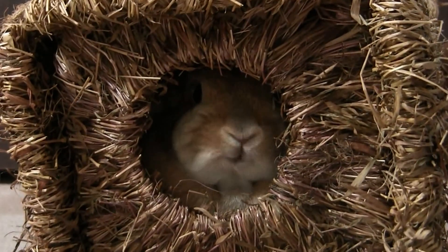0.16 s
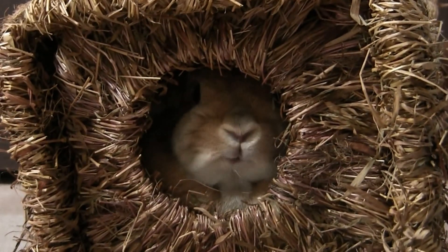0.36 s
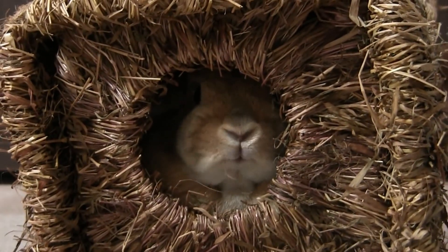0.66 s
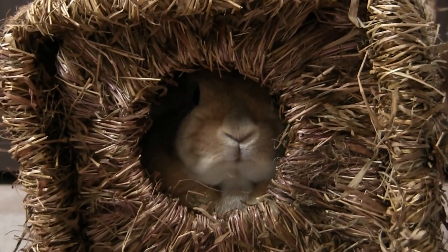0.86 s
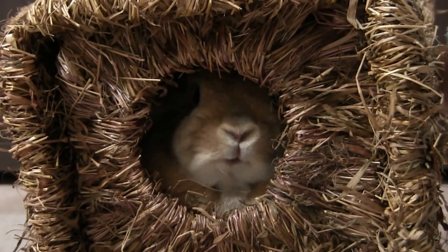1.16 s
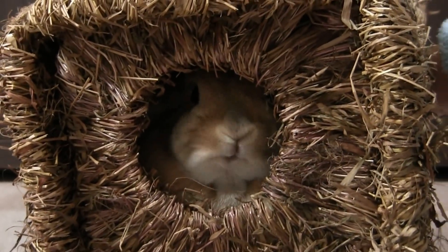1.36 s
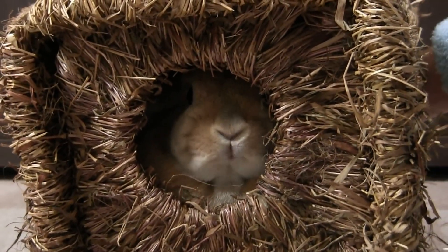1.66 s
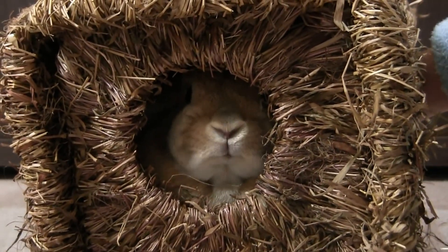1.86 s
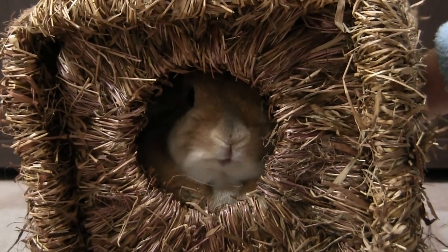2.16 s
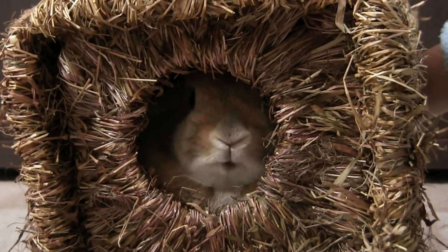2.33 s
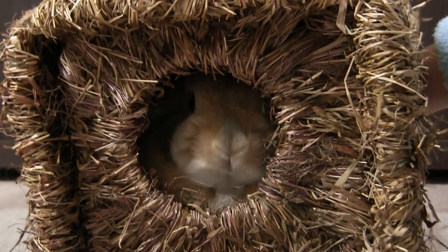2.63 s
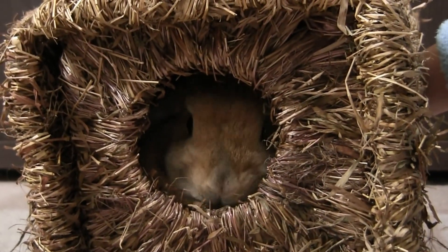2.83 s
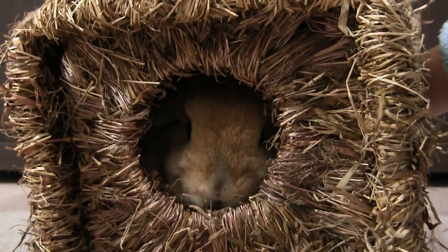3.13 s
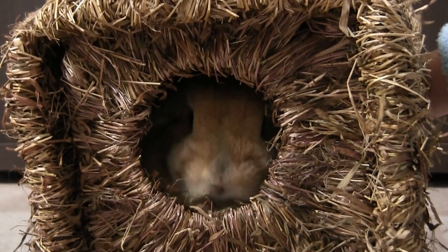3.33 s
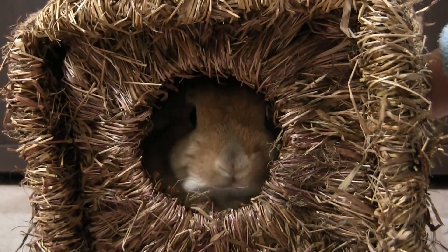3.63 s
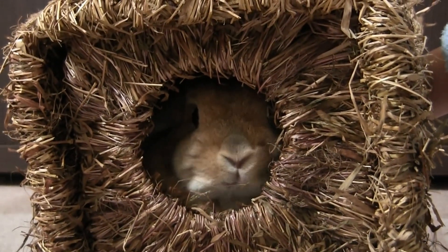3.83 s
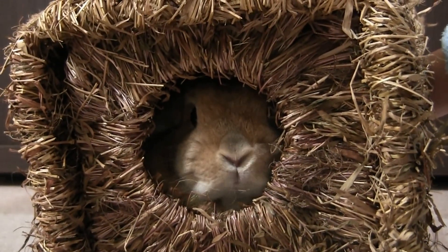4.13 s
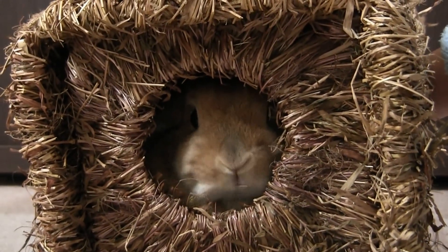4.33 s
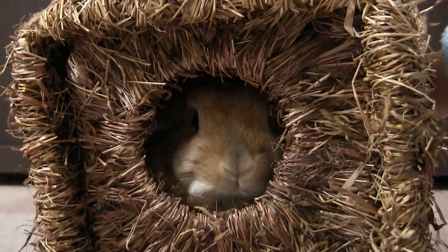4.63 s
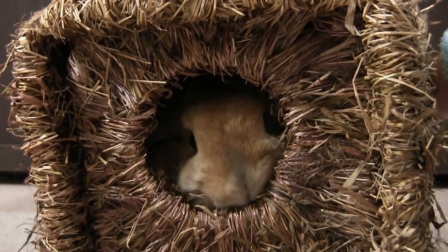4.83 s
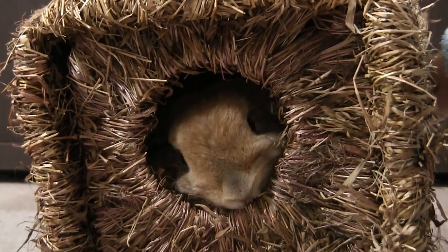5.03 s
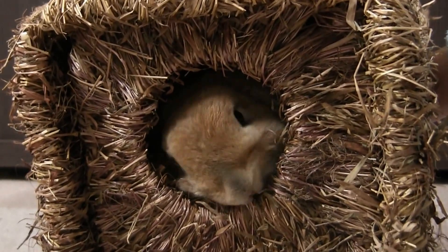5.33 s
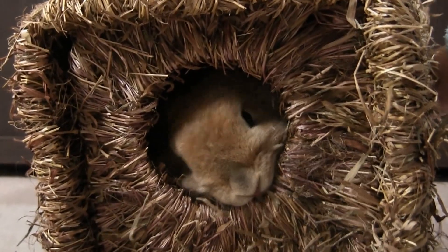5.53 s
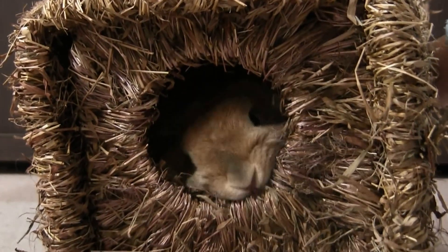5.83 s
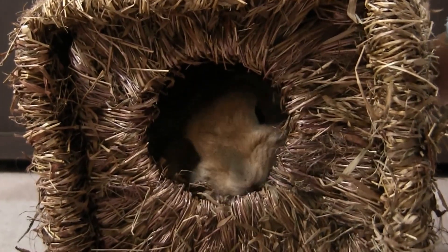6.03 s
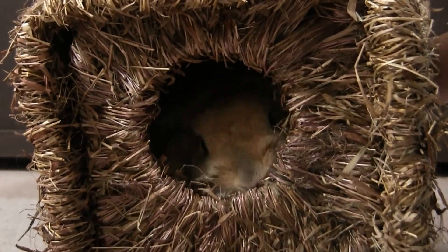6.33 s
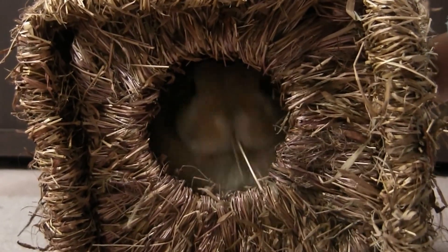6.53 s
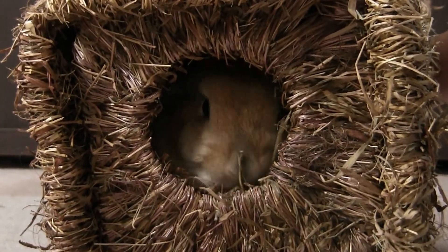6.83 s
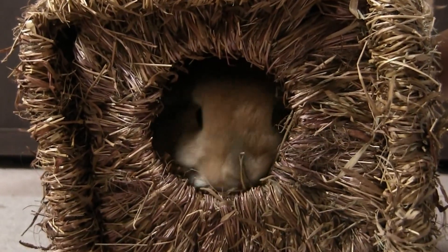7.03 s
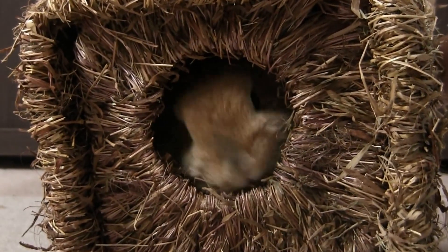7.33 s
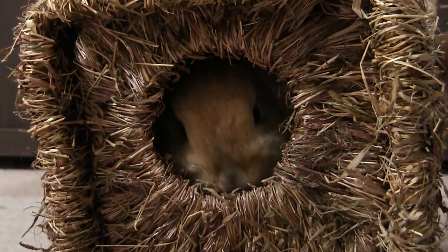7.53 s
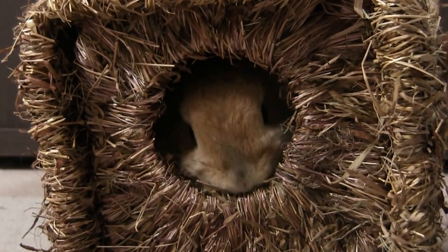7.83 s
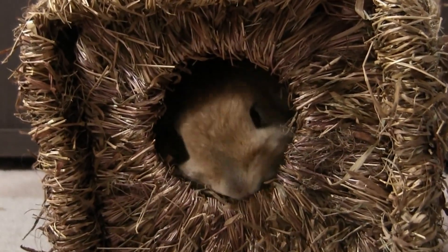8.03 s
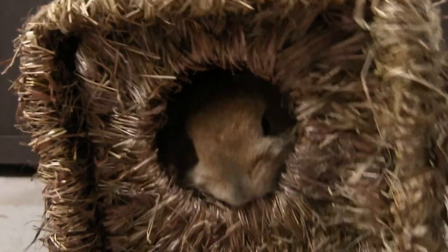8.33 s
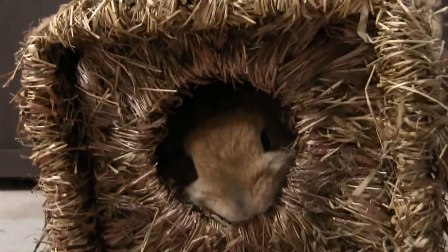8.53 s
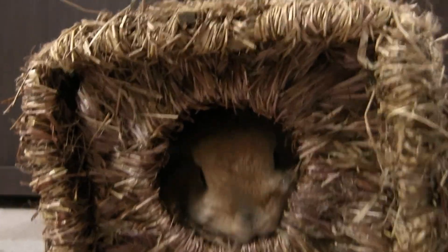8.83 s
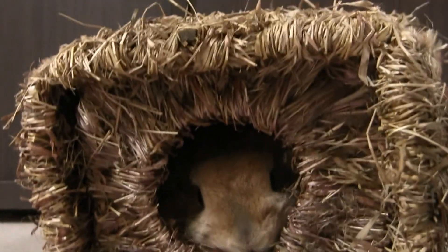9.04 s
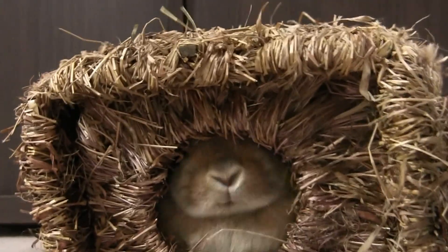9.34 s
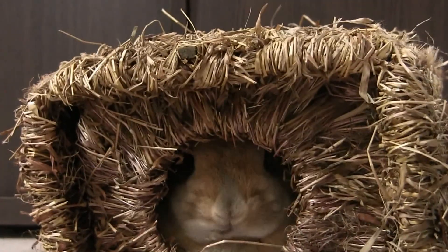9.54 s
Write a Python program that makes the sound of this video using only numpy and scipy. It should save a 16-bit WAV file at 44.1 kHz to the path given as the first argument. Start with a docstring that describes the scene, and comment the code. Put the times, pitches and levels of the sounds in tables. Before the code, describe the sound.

Close, steady rabbit nibbling over a faint room hum gives way to bursts of dry stalks cracking, crunching and rustling as it tears woven straw.

```python
"""First a small room hums softly, and close by a rabbit chews about five times a second in its grass hut.
Then it bites and tugs at the wall: stalks snap in sharp clusters while the weave rustles and crackles.
Chewing is made of small double ticks, gritty crunches and a few soft lisps. Rustling is many tiny slips of
straw plus fine noise. A snap is a bright ringing crack over a woody knock. The hut bumps low, and the room
adds a short echo."""
import sys
import numpy as np
from scipy import signal
from scipy.fft import rfft, irfft
from scipy.io import wavfile

SR = 44100
rng = np.random.default_rng(int(sys.argv[2]) if len(sys.argv) > 2 else 0)


def master_out(mix):
    """Clip the mix to full scale and print it as 16-bit PCM to the path in sys.argv[1]."""
    frames = np.transpose(np.atleast_2d(mix))
    ceiling = np.clip(frames, -1, 1)
    pcm = np.round(ceiling * 32767).astype(np.int16)
    wavfile.write(sys.argv[1], SR, pcm)


N = 426888  # length of the sound in samples
BINS = np.fft.rfftfreq(1024, 1 / SR)  # frequencies (Hz) at which the short pulses are shaped

# Steady noise of the room, relative colour: pitch_hz, level_db_per_hz
AIR_COLOUR = [(20, -26.5), (33, -30.5), (46, -3.5), (66, -9), (100, 0.5), (220, 0.5), (400, -5.5),
              (600, -11), (1100, -10.5), (2000, -18.5), (4000, -21.5), (8000, -28), (13300, -31),
              (14600, -65.5)]
AIR_DB = -54.5  # rms level of that noise
# Likeness of the room noise in both channels: pitch_hz, likeness_0_to_1
AIR_LIKENESS = [(40, 0.98), (125, 0.98), (280, 0.91), (600, 0.54), (1500, 0.76), (6000, 0.69),
                (14000, 0.11)]
# Hum of an appliance: pitch_hz, level_db (rms), pitch_waver_hz, level_throb_db
WAVERING_HUMS = [(45.5, -68, .8, 2), (242.2, -65, 1.8, 3), (339.5, -64.5, 2.2, 2), (484.5, -71.5, 1.8, 2),
                 (726.7, -71, 2.2, 1.5)]
# Level of a steadier hum, strongest after the middle: time_s, level_db (rms)
STEADY_HUM_LEVEL = [(0, -75.5), (4, -76.5), (5.3, -66), (7.4, -63.5), (8.1, -69.5), (8.6, -79.5),
                    (9.68, -77)]
STEADY_HUM_HZ = 118.5

# How long the room rings: pitch_hz, t60_s (time to fall by 60 dB)
ROOM_T60 = [(200, 0.26), (1000, 0.1969), (3000, 0.5), (7000, 0.23), (15000, 0.01)]
# Colour of the room's ring: pitch_hz, level_db
ROOM_COLOUR = [(200, -10.5), (1000, -1), (3000, -3), (8000, -2), (15000, -1)]
# How the hut reaches the two microphone ports: pitch_hz, left_minus_right_db
PORT_LEAN = [(300, 1.14), (1500, 0.23), (5000, -0.34), (7000, -0.3), (10000, -0.94), (12500, -2.5),
             (16000, -1.5)]
# Phase by which the left port leads: pitch_hz, lead_radians
PORT_LEAD = [(300, 0), (4000, 0.036), (9000, 0.00093), (12500, -.12), (15000, 0)]
EDGE_HZ = 16600  # the recorder keeps what lies below this

# Dull bumps of the hut as the rabbit shifts or the wall springs back:
# start_s, peak_db, pitch_hz, t60_s
BUMPS = [(1.244, -34, 166.1, 0.114), (1.256, -36, 293, 0.094), (1.29, -47, 212.5, 0.65),
         (3.115, -44.5, 162, 0.13), (4.573, -43, 218.5, 0.132), (4.591, -52.5, 102, 0.23),
         (4.61, -46, 165, 0.142), (4.625, -49.5, 70, .3), (5.636, -40.5, 230.6, 0.031),
         (5.652, -35.5, 420, 0.0235), (5.665, -42.5, 368, 0.018), (6.507, -36, 130, 0.036),
         (6.53, -38.5, 110, 0.074), (8.886, -30, 230, 0.0216), (9.347, -34.5, 130.2, .025),
         (9.3548, -29, 125, 0.0177)]

# Two resonances of the soft lisp of chewing: pitch_hz, width_hz, level_db
LISP_MODES = [(7500, 1780, 5.5), (11500, 1250, 6)]
# Level of each lisp in turn: level_db
LISP_DB = [-62, -63, -60.5, -59, -76, -59.5]
LISP_LEAD_S, LISP_S = 0.0464, 0.08  # from middle of lisp to tooth click, and length of lisp

# Strokes of the jaw; levels are before common trims:
# start_s, click_db, knock_db, grit_db, knock_hz, second_click_db (relative to the first)
CHEWS = [(.097, -47.5, -40.5, -62, 1050, -11), (.292, -59.5, -54.5, -61.5, 1000, -6),
         (0.4803, -50, -41, -53, 950, -2), (.690, -48, -40.5, -55.5, 1050, -1.5),
         (.9024, -45, -48, -57.5, 1100, -12.5), (1.1155, -49, -42.5, -59, 1040, -11.5),
         (1.3, -62.5, -46.5, -55.5, 1097, -7), (1.496, -45.5, -49, -65, 1100, -10.5),
         (1.7075, -55.5, -41.5, -59, 1000, -5.5), (1.897, -53, -62, -69, 1000, -9.5),
         (2.1276, -45.5, -40, -66.5, 1550, -13), (2.3344, -42.5, -41, -59, 1000, -19),
         (2.5374, -45, -33, -51, 1030, 5.5), (2.742, -47, -46, -60.5, 1300, -6),
         (2.9205, -45, -41, -55, 1300, -11.5), (3.111, -51, -40, -57, 1470, -5),
         (3.29, -65, -58.5, -70.5, 1000, -6.5), (3.4633, -48, -52, -64, 1300, -11),
         (3.587, -51.5, -51.5, -65.5, 1197, -13), (3.785, -52.5, -50.5, -64, 1200, -12),
         (4.187, -47.5, -42.5, -60.5, 1150, -13.5), (4.59, -51.5, -41, -62, 1100, -8),
         (5.1133, -55, -39.5, -64, 1450, -17)]
# Colour of a click between the teeth, shaped by the mouth: pitch_hz, level_db
TOOTH_COLOUR = [(300, -25.5), (2000, -9), (3200, -8), (4400, -2.5), (5900, -11.5), (7200, 4), (8800, -0.5),
                (9800, -2.5), (12200, -2), (13300, -8.5), (14800, -24.5)]
# The teeth slip and meet again this much later, with a knock at least this much weaker
SLIP_S, SLIP_KNOCK_DB = 0.0067, -5.5
GRIND_S, GRIND_HZ = .028, 1250  # length and pitch of the grinding around each tooth click
# Gritty crunches and dull scrapes of fibres; levels are before a common trim:
# start_s, length_s, level_db, pitch_hz
CRUNCHES = [(.078, 0.00665, -46, 1190), (.684, 0.017, -55, 3500), (.945, 0.0087, -52.5, 1000),
            (2.497, 0.0083, -52, 1300), (2.645, 0.042, -60.5, 3100), (2.93, 0.006, -52.5, 3770),
            (4.357, 0.038, -56, 1190), (4.407, 0.084, -61.5, 4200), (5.847, 0.023, -52, 1100),
            (5.939, 0.023, -51.5, 896), (6.994, 0.0086, -52, 1300), (7.775, 0.00434, -48.5, 2380),
            (8.167, 0.0683, -48.5, 710), (8.328, 0.04, -55, 2200), (8.375, 0.063, -56, 3000),
            (8.798, 0.0167, -48.5, 1656), (8.882, 0.0096, -40, 1140), (9.358, .03, -49.5, 1705)]

# Colour of rubbing straw: pitch_hz, level_db
STRAW_COLOUR = [(100, -30), (350, -10), (900, -7), (1500, -8.5), (2500, -8.8), (3700, -9.8), (5200, -5.5),
                (7000, -.5), (10500, 0), (13000, -2), (14600, -5.5), (15400, -24)]
# How hard the rabbit's body leans and rubs on the straw: time_s, level_db
LEANING = [(0, -67.5), (.7, -65), (1.0, -70), (1.35, -64), (1.75, -69.5), (2.48, -72), (2.75, -68.5),
           (3.5, -66), (3.85, -70.5), (4.1, -64), (4.68, -68.5), (4.95, -60), (5.401, -63), (6.72, -59.5),
           (7.0, -61), (7.2, -63), (7.5, -59), (7.8, -61), (8.68, -54.5), (9.0, -51.5), (9.11, -55.5),
           (9.25, -50.5), (9.4, -51), (9.52, -62.5), (9.68, -69)]
FIDGET_DB, FIDGET_HZ = 1.25, 10.9  # rms depth and rate of its fidgeting
# Tugs or brushes at the weave: start_s, length_s, level_db
TUGS = [(0.627, 0.105, -63), (2.605, 0.071, -64.5), (2.94, 0.069, -61), (3.31, 0.039, -62),
        (3.44, 0.0454, -60), (4.019, 0.074, -62.5), (4.319, 0.217, -60), (4.803, 0.093, -58.5),
        (5.073, 0.049, -54), (5.138, 0.095, -53.5), (5.181, 0.04, -53), (5.485, 0.0443, -40.5),
        (5.519, 0.0402, -49), (5.489, 0.444, -52.5), (5.624, 0.077, -42.5), (5.839, 0.04, -42),
        (5.882, 0.1335, -52.5), (6.034, 0.0497, -50), (6.266, 0.0516, -48.5), (6.342, 0.0952, -45.5),
        (6.476, 0.062, -37), (6.524, 0.028, -35), (6.54, .026, -37), (6.62, 0.0546, -44),
        (6.811, 0.037, -54), (6.952, 0.0323, -53), (7.04, 0.044, -60.5), (7.355, 0.101, -55.5),
        (8.152, 0.0488, -42.5), (8.205, 0.0222, -44.5), (8.285, 0.3055, -45.5), (8.246, 0.106, -48),
        (8.32, 0.058, -38), (8.37, 0.07, -42.5), (8.621, 0.0175, -45.5), (8.737, 0.0975, -53),
        (8.852, 0.0696, -42), (8.8832, 0.0099, -33), (8.919, 0.039, -44), (8.986, 0.1087, -46.5),
        (9.123, 0.059, -50.5), (9.212, 0.042, -47.5), (9.347, 0.0442, -35.5), (9.37, .06, -44.5)]
TUG_ARCH = 0.5  # shape of a tug's swell: smaller means a flatter top
TUG_SLACK = 0.31  # share of the tug spent taking up the slack

# Stalks bitten through; levels are rms over 1 ms before common trims:
# start_s, crack_db, knock_db, ring_hz, ring_height_db, knock_hz, overtone_height_db
SNAPS = [(4.9435, -45.5, -42.5, 3900, 22, 900, 16), (5.1953, -35, -52, 8100, 9, 910, 8),
         (5.2121, -40.5, -49.5, 9900, 5.5, 1050, 8.5), (5.2145, -40.5, -48.5, 6500, 5, 1050, 8),
         (5.2357, -34.5, -41.5, 8800, 2.5, 1150, 20.5), (5.2408, -28.5, -36.5, 7100, 7, 1290, 23.5),
         (5.2679, -37, -45, 5100, 8, 1200, 17), (5.479, -44.5, -44.5, 5660, 11, 1000, 4),
         (5.5145, -27, -30, 10100, 4.5, 1290, 17.5), (5.6037, -38, -50.5, 10000, 6.5, 1000, 8),
         (5.6153, -41, -49.5, 9950, 3.5, 1000, 8), (5.6263, -29, -54.5, 9500, 8.5, 1100, 8),
         (5.642, -19, -30, 6400, 6, 930, 0), (5.6526, -14.5, -15, 10000, 4.5, 920, 17),
         (5.6643, -16.5, -21, 5900, 8, 890, -7.5), (5.8852, -32, -29, 7500, 2, 1110, 6.5),
         (5.8926, -42.5, -42.5, 8300, 1.5, 1097, 8), (5.902, -38.5, -53, 5500, 7, 1000, 8),
         (5.9154, -33, -43, 11100, 8.5, 1096, 8.5), (5.918, -38, -47.5, 6000, 5, 1100, 8),
         (5.9357, -28.5, -31, 10800, 3.5, 1000, 21), (5.94, -18.5, -18, 9840, 7.5, 1000, 11),
         (5.984, -38, -54, 10100, 12, 1000, 8), (6.033, -28.5, -35.5, 12100, 6, 1140, 18),
         (6.0476, -37, -38.5, 7950, 8.5, 1100, 9.5), (6.066, -28.5, -35.5, 7160, -2.5, 1360, 23),
         (6.0718, -34.5, -50, 12600, 1.5, 1000, 8), (6.3775, -29.5, -32.5, 10400, 5.5, 1114, 16),
         (6.507, -20.5, -16, 9610, 12.5, 1150, 12), (6.513, -20, -27, 9630, 17, 1080, 15.5),
         (6.5222, -16.5, -21.5, 11800, 8, 850, 13), (6.5263, -24.5, -27.5, 8000, 11, 1000, 10),
         (6.532, -24, -22.5, 6540, 7, 1070, 17), (6.5425, -27, -40, 8500, 4, 1000, 10),
         (6.5628, -33, -46, 12000, 13, 1000, 8), (6.5971, -37, -40, 7750, 4, 1250, 14),
         (6.6254, -33.5, -37, 8250, 6, 1150, 12.5), (6.6361, -33.5, -42.5, 10700, -1.5, 1200, 14.5),
         (6.6535, -37, -48, 6500, 11, 1000, 10), (7.384, -43, -57.5, 10680, 9.5, 1000, 10),
         (7.427, -38.5, -46.5, 10300, 6.5, 1300, 22.5), (7.461, -43, -54.5, 7040, 3, 1000, 8),
         (7.6545, -44, -43, 5500, 10.5, 1147, 13), (8.1669, -32.5, -44.5, 7180, 4, 899, 8),
         (8.1772, -33, -39, 8540, 6, 900, 8.5), (8.187, -36.5, -37.5, 7500, 2, 950, 1.5),
         (8.1932, -36, -40, 6400, 8, 901, 9.5), (8.199, -38.5, -39, 7790, 5.5, 949, 6.5),
         (8.2101, -28, -36, 8270, 11.5, 1100, 18), (8.22, -30.5, -37.5, 9000, 1, 1000, 15),
         (8.2255, -37, -45.5, 7200, 4, 1000, 9.5), (8.2641, -23, -28.5, 4700, 7, 906, 1),
         (8.3683, -22.5, -52, 9700, 3, 1100, 10), (8.4312, -36.5, -49, 9880, 5, 1000, 8),
         (8.5445, -29, -32.5, 12450, 5.5, 1284, 21.5), (8.5568, -33, -41, 4890, 12, 1110, 11),
         (8.6305, -25.5, -36.5, 6950, 8, 1150, 18.5), (8.6344, -29.5, -32, 10400, 4, 1030, 16.5),
         (8.8608, -27, -35.5, 7000, 4, 905, 10), (8.883, -26, -37.5, 10100, 4, 800, 10),
         (8.8859, -27, -26.5, 6740, 8, 1000, 0), (8.8905, -29, -28, 5800, 4, 700, 13),
         (8.8966, -13.5, -33, 10170, 11, 1000, 9), (8.9122, -41, -52.5, 9560, 8.5, 1000, 8),
         (8.9805, -45.5, -54, 5800, 8, 1000, 8), (9.086, -36.5, -41, 6800, -2, 900, 8),
         (9.1, -39, -47.5, 9640, 4, 1000, 8), (9.123, -37, -43.5, 11200, 2, 1300, 21.5),
         (9.1563, -36.5, -38, 6990, 5.5, 1303, 23.5), (9.2717, -36.5, -56.5, 9050, 2.5, 1100, 8.5),
         (9.2898, -36.5, -46, 9940, 5, 1310, 20), (9.3478, -20, -23.5, 12600, 10.5, 1000, 21.5),
         (9.3554, -12, -19, 6620, 7, 1000, 19.5)]
# Colour of a stalk's crack: pitch_hz, level_db
CRACK_COLOUR = [(300, -39.5), (2000, -25), (4100, -13.5), (5300, 1), (7000, 3.5), (10500, 0), (13000, 3),
                (15500, -12.5), (17000, -24)]
# Colour of the knock that a bite sends through jaw and hut, centred at KNOCK_HZ: pitch_hz, level_db
KNOCK_COLOUR = [(40, -22), (150, -15), (430, -3), (600, -4.5), (950, 2.5), (1200, -2), (1700, -17.5),
                (2500, -11.5), (3500, -13), (6000, -18.5), (16000, -66.5)]
KNOCK_HZ = 1000
# Woody overtone: pitch over the knock's, width (natural log of pitch), usual height in dB
OVERTONE_RATIO, OVERTONE_WIDTH, OVERTONE_DB = 1.818, 0.217, 6.5
# Lift of the topmost treble by crack level: crack_db, top_treble_lift_db
TOP_LIFT = [(-35.5, -5.5), (-20.5, 11.5)]
LIFT_FROM_HZ, LIFT_FULL_HZ = 13900, 14940  # band over which that lift comes in
# Usual ring pitch and height of a stalk, and the spread of pitch in octaves
STALK_HZ, STALK_DB, STALK_OCTAVES = 8380, 2, 0.285


def amp(db):
    """Turns decibels into gain."""
    return 10 ** (np.asarray(db) / 20)


def unit(x):
    """Scales to rms 1."""
    return x / np.sqrt(np.mean(x ** 2) + 1e-20)


def read(points, hz):
    """Reads a table on a logarithmic frequency axis."""
    f, value = np.transpose(points)
    return np.interp(np.log(hz + 1), np.log(f), value)


def over_time(points):
    """Draws straight lines between the timed points of a table."""
    return np.interp(np.arange(N) / SR, *np.transpose(points))


def add(mix, s, sound):
    """Mixes a sound in at time s."""
    part = mix[..., max(round(s * SR), 0):][..., :sound.shape[-1]]
    part += sound[..., :part.shape[-1]]


def wander(rate_hz, size=4096):
    """Slow random motion of about rms 1, made of noise mostly below rate_hz."""
    hz = np.arange(size // 2 + 1) * SR / N
    slow = rfft(rng.standard_normal(size)) / (1 + (hz / rate_hz) ** 4)
    coarse = unit(irfft(slow, size))
    return np.interp(np.arange(N) * size / N, np.arange(size), coarse)


def peak(hz, width):
    """A bell of height 1 on a logarithmic frequency axis."""
    return np.exp(-.5 * (np.log((BINS + 1) / hz) / width) ** 2)


def ripple(width_hz):
    """Random peaks and dips across frequency, so no two pulses sound alike."""
    bell = np.exp(-.5 * ((BINS - BINS.mean()) / width_hz) ** 2)
    return unit(signal.fftconvolve(rng.standard_normal(len(BINS)), bell, "same"))


def click(db):
    """The sharpest pulse with this spectrum that does not start early, of energy 1."""
    log_gain = np.log(amp(np.r_[db, db[-2:0:-1]]))
    # the Hilbert transform gives the phase that packs the energy at the start
    pulse = np.fft.ifft(np.exp(np.conj(signal.hilbert(log_gain)))).real
    return pulse / np.linalg.norm(pulse)


def splinter(pulse, share, decay_s):
    """Follows a break with a quick dying spray of smaller breaks, of total energy 1."""
    t = np.arange(len(pulse)) / SR
    spray = rng.standard_normal(len(t)) * np.exp(-t / decay_s)
    spray *= share / np.linalg.norm(spray)
    spray[0] += 1
    out = signal.fftconvolve(pulse, spray)
    return out / np.linalg.norm(out)


def background():
    """Soft room noise, wavering hums and one steadier hum."""
    hz = np.fft.rfftfreq(N, 1 / SR)
    same = np.clip(read(AIR_LIKENESS, hz), 0, 1)
    noise = rfft(rng.standard_normal((2, N))) * amp(read(AIR_COLOUR, hz))
    mid, side = noise * np.sqrt([1 + same, 1 - same])
    out = amp(AIR_DB) * unit(irfft(np.array([mid + side, mid - side]), N))
    for pitch, db, waver_hz, throb_db in WAVERING_HUMS:
        turns = np.cumsum(pitch + waver_hz * wander(6.01)) / SR
        throb = amp(throb_db * wander(5.57))
        out = out + amp(db) * unit(throb * np.sin(2 * np.pi * turns))
    steady = unit(np.sin(2 * np.pi * STEADY_HUM_HZ * np.arange(N) / SR))
    return out + amp(over_time(STEADY_HUM_LEVEL)) * steady


def room(x, wet_db=-14, first_s=0.00158, breadth=0.04):
    """Dense reflections, different at each channel, each band dying at its own speed."""
    t = np.arange(SR // 2) / SR
    fade_in = np.clip((t - first_s) / first_s, 0, 1)
    mid, side = rng.standard_normal((2, len(t))) * fade_in
    pair = np.array([mid + breadth * side, mid - breadth * side])
    hz, age, bands = signal.stft(pair, SR, nperseg=256)
    fall_db = 60 * age / read(ROOM_T60, hz)[:, None]
    bands = bands * amp(read(ROOM_COLOUR, hz)[:, None] - fall_db)
    tail = signal.istft(bands, SR, nperseg=256)[1]
    return amp(wet_db) * signal.fftconvolve(x, tail / np.linalg.norm(tail[0]), axes=1)[:, :N]


def ports(x, scatter_db=-17, scatter_s=0.0026):
    """Two closely spaced ports differ a little in level and phase, mostly in the treble."""
    t = np.arange(1024) / SR
    # thin stalks scatter mostly short waves, with opposite sign at each port; diff favours the treble
    paths = np.diff(rng.standard_normal(len(t)) * np.exp(-t / scatter_s))
    paths = paths / np.linalg.norm(paths)
    scatter = amp(scatter_db) * signal.oaconvolve(x.mean(0), paths)[:N]
    hz = np.fft.rfftfreq(N, 1 / SR)
    # each port takes half of the difference
    half = amp(read(PORT_LEAN, hz) / 2) * np.exp(.5j * read(PORT_LEAD, hz))
    return irfft(rfft(x) * np.array([half, 1 / half]), N) + np.array([scatter, -scatter])


def bumps(rise_s=0.0067, rise_share=0.099):
    """Pushes set the hut ringing low; the shortest rings rise quickest."""
    out, t = np.zeros(N), np.arange(SR // 2) / SR
    for s, db, hz, t60 in BUMPS:
        rise = np.minimum(t / min(rise_s, rise_share * t60), 1)
        fall = amp(db - 60 * t / t60)
        add(out, s, fall * rise * np.sin(2 * np.pi * hz * t))
    return out


def lisps():
    """Every second early chew lets out a soft hiss through two narrow resonances."""
    hz = np.fft.rfftfreq(N, 1 / SR)
    colour = np.zeros(len(hz))
    for centre, width, db in LISP_MODES:
        colour += amp(db) / (1 + ((hz - centre) / width * 2) ** 2)
    swell = np.zeros(N)
    # the lisps end when the list of levels runs out
    for (s, *_), db in zip(CHEWS[::2], LISP_DB):
        add(swell, s - LISP_LEAD_S - LISP_S / 2, amp(db) * np.hanning(int(LISP_S * SR)))
    hiss = unit(irfft(rfft(rng.standard_normal(N)) * colour, N))
    return swell * hiss


def crunches(rows, grits_per_s=900, width=0.7, fall_db=20, level_db=-4.0):
    """Fibres give way one after another: a short run of dull, muffled clicks."""
    out = np.zeros(N)
    for s, length, db, hz in rows:
        size = int(length * SR)
        hits = 0.0465 + (rng.random(size) < grits_per_s / SR)  # a faint noise floor under the clicks
        grits = rng.standard_normal(size) * hits * signal.windows.tukey(size, .4)
        treble_loss_db = 10 * np.log10(1 + (BINS / hz / 2) ** 2)
        colour = fall_db * peak(hz, width) - treble_loss_db + 2 * ripple(158)
        add(out, s, amp(db + level_db) * signal.fftconvolve(unit(grits), click(colour)))
    return out


def grinding():
    """Each jaw stroke grinds briefly around its tooth click: rows for crunches()."""
    return [(s - GRIND_S / 2, GRIND_S, grit_db, GRIND_HZ) for s, _, _, grit_db, *_ in CHEWS]


def tooth_clicks():
    """The teeth meet, slip and meet again in a tiny woody double tick: rows for snaps()."""
    rows = []
    for s, click_db, knock_db, _, hollow_hz, slip_db in CHEWS:
        colour = (STALK_HZ, STALK_DB, hollow_hz, OVERTONE_DB)
        second_knock_db = knock_db + min(slip_db, SLIP_KNOCK_DB)
        rows.append((s, click_db, knock_db, *colour))
        rows.append((s + SLIP_S, click_db + slip_db, second_knock_db, *colour))
    return rows


def strain():
    """Force on the straw over time: the fidgeting lean of the body plus an arch for each tug."""
    power = amp(over_time(LEANING) + FIDGET_DB * wander(FIDGET_HZ)) ** 2
    for s, length, db in TUGS:
        gone = np.arange(0, length, 1 / SR) / length
        slack = np.minimum(gone / TUG_SLACK, 1) ** .5
        arch = np.sin(np.pi * gone) ** abs(TUG_ARCH) * slack
        add(power, s, (amp(db) * arch) ** 2)
    return np.sqrt(power)


def rustle(pull, slips_per_s=3400, spread_db=4.5, fizz=1.0, flutter_db=2.5, level_db=0, count=16):
    """Many tiny stick-slips, each ringing one of the stalks, over a fine fizz of sliding fibres."""
    force = pull * amp(flutter_db * wander(35.2))
    colour = read(STRAW_COLOUR, BINS)
    sizes = amp(spread_db * np.minimum(rng.exponential(1, N), 5))
    slips = sizes * (rng.random(N) < slips_per_s / SR)
    slips = unit(slips * rng.choice([-1, 1], N)) * force
    stalk = rng.integers(0, count, N)
    out = np.zeros((2, N))
    for k in range(count):
        ring = splinter(click(colour + 4 * ripple(508)), share=0.62, decay_s=0.00092)
        pan_db = 1.3 * rng.standard_normal()
        out += amp([[pan_db], [-pan_db]]) * signal.oaconvolve(slips * (stalk == k), ring)[:N]
    out += fizz * signal.oaconvolve(force * rng.standard_normal(N), click(colour))[:N]
    return amp(level_db) * out / np.hypot(1, fizz)


def small_snaps(force, most_per_s=50, half_rate_db=-52, over_db=7, spread_db=1.5,
                ceiling_db=-43, knock_db=-16, count=600):
    """Thin stalks give way at random, more often and up to a limit louder the harder the strain."""
    rows = []
    places = rng.random((count, 2))
    shapes = rng.standard_normal((count, 3))
    for (place, chance), (size, ring, hollow) in zip(places, shapes):
        pull = force[int(place * N)]
        per_s = most_per_s * pull / (pull + amp(half_rate_db))
        if chance < per_s * N / SR / count:
            db = min(20 * np.log10(pull) + over_db, ceiling_db) + spread_db * size
            ring_hz = STALK_HZ * 2 ** (STALK_OCTAVES * ring)
            hollow_hz = KNOCK_HZ * 2 ** (STALK_OCTAVES * hollow)
            rows.append((place * N / SR, db, db + knock_db, ring_hz, STALK_DB, hollow_hz, OVERTONE_DB))
    return rows


def snaps(breaks, colour, crack_db, knock_db, ringing, uneven_db, ring_width=0.094):
    """Each break is a bright crack, ringing if asked, over a short woody knock with two resonances."""
    out = np.zeros(N)
    top = np.interp(BINS, [LIFT_FROM_HZ, LIFT_FULL_HZ], [0, 1])
    for s, bright_db, hollow_db, ring_hz, ring_db, hollow_hz, overtone_db in breaks:
        bright = read(colour, BINS) + ringing * ring_db * peak(ring_hz, ring_width)
        bright += top * np.interp(bright_db, *np.transpose(TOP_LIFT))
        bright_click = click(bright + uneven_db * ripple(334))
        crack = splinter(bright_click, share=0.703, decay_s=0.00075)

        hollow = read(KNOCK_COLOUR, BINS * KNOCK_HZ / hollow_hz)
        hollow += overtone_db * peak(OVERTONE_RATIO * hollow_hz, OVERTONE_WIDTH)
        hollow_click = click(hollow + uneven_db * ripple(253))
        knock = splinter(hollow_click, share=0.234, decay_s=0.0039)
        add(out, s, -amp(bright_db + crack_db) * crack - amp(hollow_db + knock_db) * knock)
    return out * np.sqrt(SR / 1000)  # energy 1 becomes rms 1 over 1 ms


def scene():
    """The rabbit's work in the straw, its echo and the room."""
    force = strain()
    breaks = list(SNAPS) + small_snaps(force)
    teeth = snaps(tooth_clicks(), TOOTH_COLOUR, crack_db=0.5, knock_db=-3.5, ringing=0, uneven_db=2.0)
    gritty = crunches(list(CRUNCHES) + grinding())
    gnawing = rustle(force) + gritty + teeth + lisps() + bumps()
    direct = gnawing + snaps(breaks, CRACK_COLOUR, crack_db=-0.5, knock_db=-4.5, ringing=1, uneven_db=2.0)
    # the room gathers what a stalk sends in all directions, which evens out its colour
    spread = gnawing + snaps(breaks, CRACK_COLOUR, crack_db=-7.5, knock_db=-6.5, ringing=0, uneven_db=-0.5)
    return ports(direct + room(spread)) + background()


def record(dry):
    """The recorder's band limit: a filter removes the highest treble."""
    low_pass = signal.firwin(255, EDGE_HZ, window=("kaiser", 9), fs=SR)
    return signal.oaconvolve(dry, low_pass[None], "same")


dry = scene()
out = record(dry)
master_out(out)
```